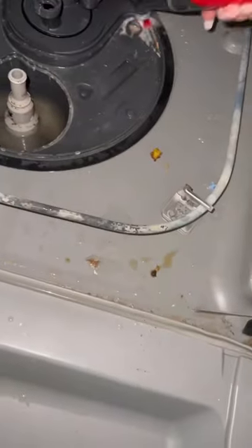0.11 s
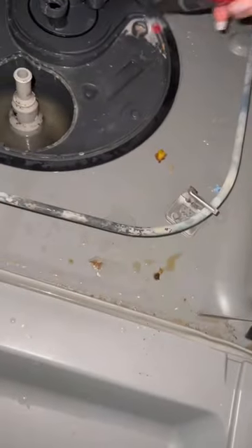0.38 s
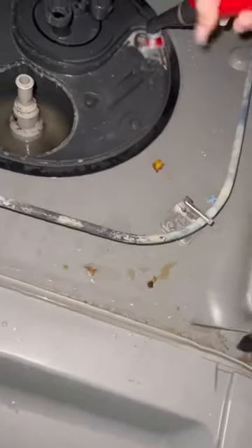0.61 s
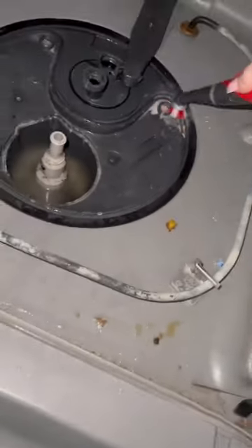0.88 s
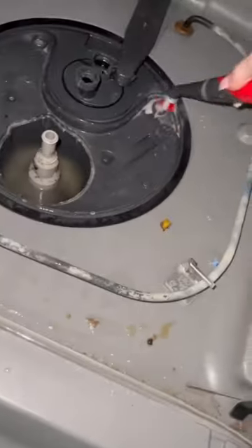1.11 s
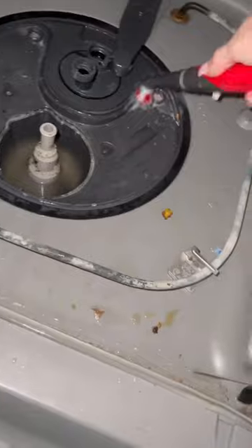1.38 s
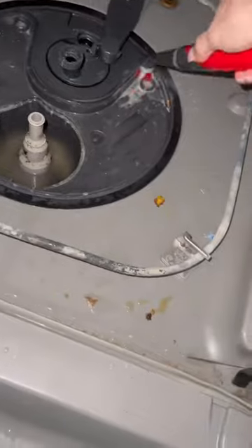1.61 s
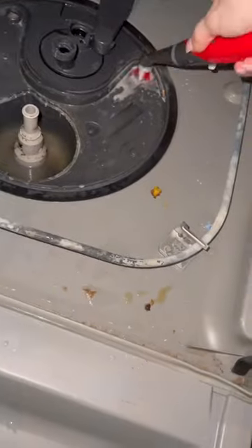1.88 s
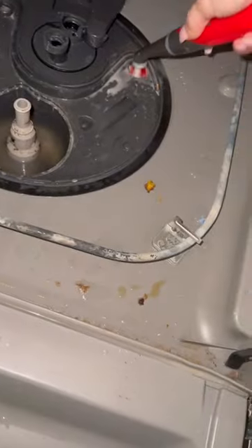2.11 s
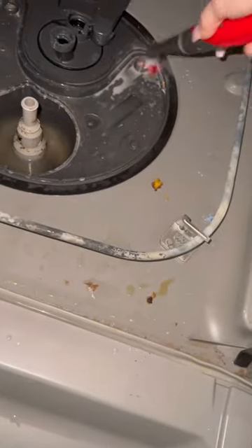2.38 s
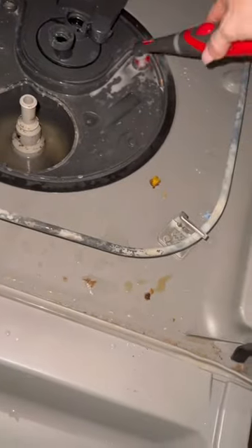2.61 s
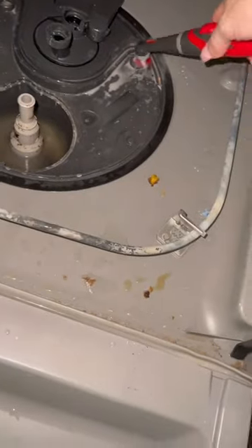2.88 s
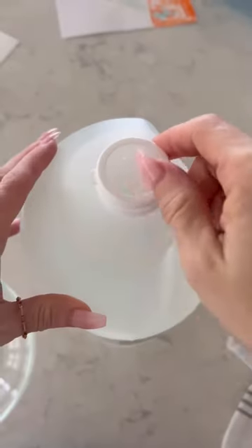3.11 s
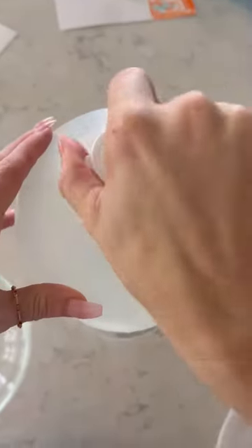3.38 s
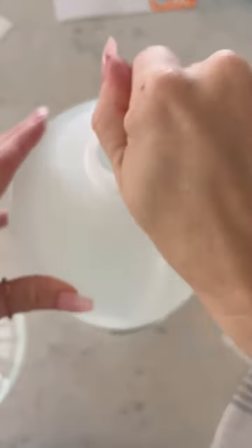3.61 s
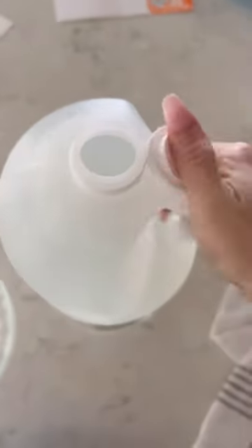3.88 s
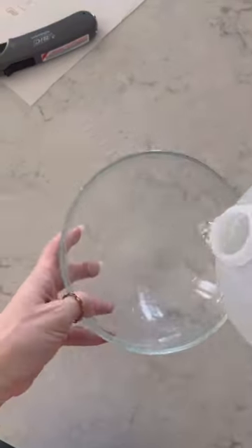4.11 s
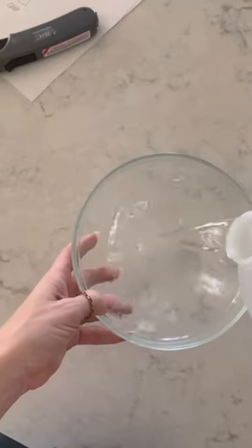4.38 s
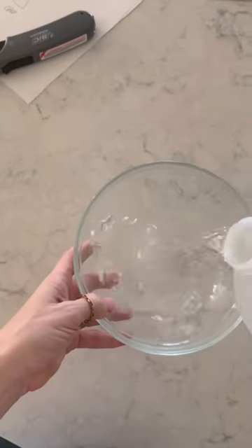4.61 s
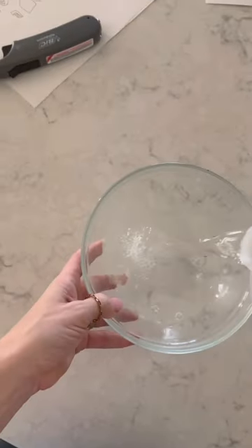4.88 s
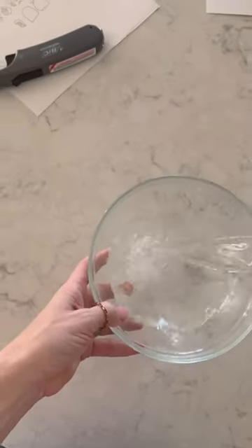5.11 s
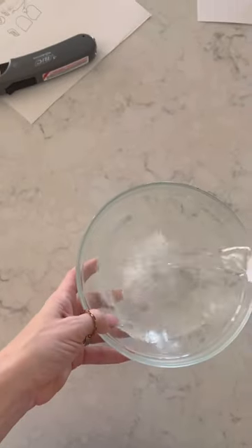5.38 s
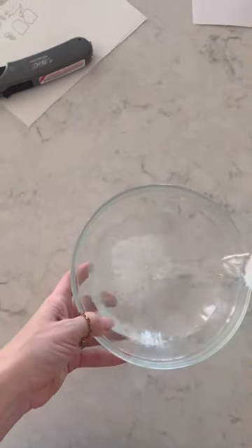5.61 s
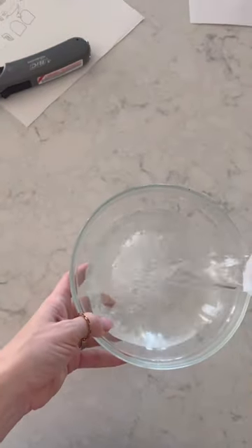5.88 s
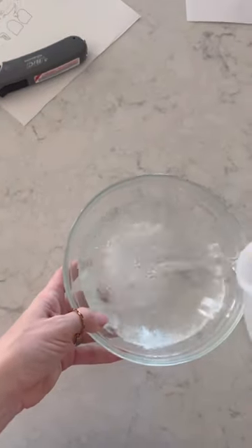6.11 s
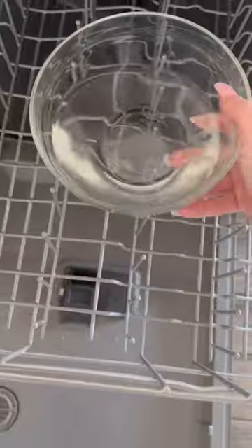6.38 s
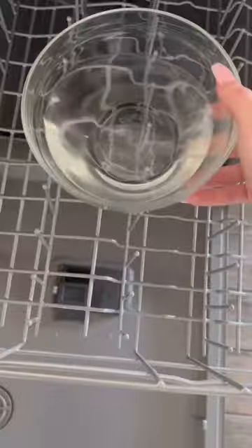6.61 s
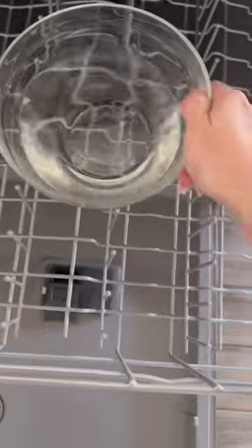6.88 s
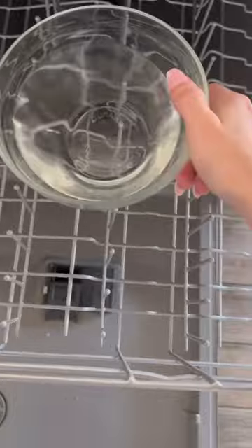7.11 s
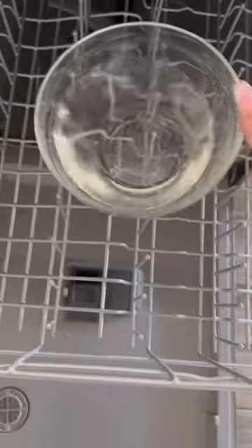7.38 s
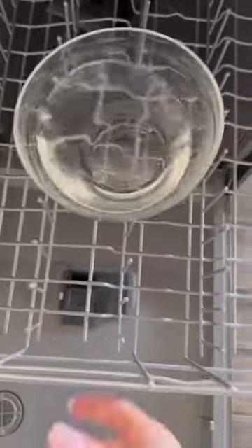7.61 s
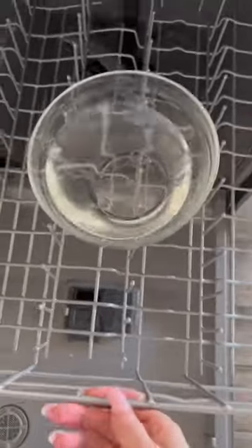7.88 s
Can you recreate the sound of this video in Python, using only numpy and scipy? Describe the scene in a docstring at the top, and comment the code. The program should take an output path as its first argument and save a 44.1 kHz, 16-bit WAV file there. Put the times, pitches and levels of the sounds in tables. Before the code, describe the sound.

From 0 to about 2.95 seconds a small motor brush scrubs a hollow plastic tub, very close and loud: rough buzzing pulses around 150 hertz, roughly eight a second at first, then less regular, sagging in pitch, with rib bumps, a strong press at 1.6 and a hard knock at 2.7. Jet hiss fills the gaps. An abrupt cut leaves a quiet kitchen hum. A tick at 3.04, then a sharp plastic crack with a hollow pop at 3.6, followed by small clicks and rasping until 3.95; faint air and rubbing near 4.1. From 4.35 to 6.25 a thin stream patters into a glass bowl, bright droplets, splashes and small bubbles slowly lowering in pitch. At 6.38 the bowl lands softly with a low ring, and at 6.75 to 7.25 drags and scrapes over wires with dull taps. Faint touches follow over room tone until 8.

```python
"""Four shots cut together, close to a phone. First a small motor brush scrubs a plastic tub (partials of the motor's
beats, coloured by the tub) while its jet hisses (noise). A jug's screw cap is turned and pops off (cracks, short
rings, rasping noise). Liquid is poured into a glass bowl (rising damped sines, splash noise). Last the bowl is set
and slid on a wire rack (resonant noise, ringing modes). A quiet kitchen hums behind (shaped noise, steady tones)."""
import sys
import numpy as np
from scipy import signal
from scipy.fft import rfft, irfft, next_fast_len
from scipy.io import wavfile
from scipy.ndimage import uniform_filter1d

SR = 44100
rng = np.random.default_rng(int(sys.argv[2]) if len(sys.argv) > 2 else 0)


def digitize_waveform(pressure):
    """Quantize a signal to 16-bit integers and store it at the path in sys.argv[1].

    Rows of a 2-D input are taken as channels; values are limited to [-1, 1].
    """
    field = np.atleast_2d(pressure).T
    bounded = np.clip(field, -1, 1)
    quanta = np.round(bounded * 32767).astype(np.int16)
    wavfile.write(sys.argv[1], SR, quanta)


def voltage_ratio(level):
    """Linear amplitude factor for a level in decibels (scalar or array-like)."""
    return 10 ** (np.asarray(level, float) / 20)


N = 352800

POUR_END_S = 6.3755  # cut from the pouring shot to the rack
# colour of the tub: (frequency [Hz], gain [dB])
TUB_COLOUR = [(55, -47.5), (90, -17.5), (150, -9), (300, 3), (390, -14), (450, -10.5), (580, -15),
              (650, -26), (755, -4), (830, -17.5), (910, -8.5), (1070, -14), (1250, -20), (1450, -23),
              (1750, -28.5), (2150, -22.5), (2600, -42.5)]
# colour of cracking and rasping plastic: (frequency [Hz], relative density [dB])
PLASTIC_COLOUR = [(650, -32), (1100, -14), (1590, -15.5), (2010, -3.5), (2700, -8.5), (4410, -7.5),
                  (5050, -8), (8260, -16), (9040, -12), (10000, -25), (11800, -17.5), (16000, -36)]
# stereo width of close sources: (frequency [Hz], side minus mid [dB])
CLOSE_WIDTH = [(60, -13), (150, -12), (380, -13), (950, 0.5), (2380, -10), (5980, -17.5), (15000, 0)]
# stereo width of the room and rack: (frequency [Hz], side minus mid [dB])
ROOM_WIDTH = [(60, -42), (150, -15.5), (380, -12), (950, -3.5), (2380, 5.5), (5980, 1), (15000, -7)]


def brush():
    """Presses couple the motor's beats into the tub; it also runs free; the jet is louder as the brush lifts."""
    # brush pressed on the tub: (peak time [s], level [dB], length [s], beats [Hz])
    strokes = [(0.043, -21, 0.052, 148), (0.16, -18.5, 0.04, 144), (0.276, -18, 0.045, 145.2),
               (0.391, -15.5, 0.027, 144), (0.513, -18.5, 0.046, 145), (0.761, -21.5, 0.026, 149.5),
               (0.874, -23, .047, 156.1), (1.002, -26, 0.059, 153.8), (1.096, -21.5, 0.028, 146.7),
               (1.135, -33, .07, 151.7), (1.232, -20.5, 0.049, 148.1), (1.336, -22.5, .047, 142.8),
               (1.486, -20, 0.061, 150.6), (1.626, -11.5, .028, 147.3), (1.799, -27.5, 0.045, 155.6),
               (1.908, -29, 0.039, 159), (1.997, -22, .075, 149.2), (2.391, -30.5, 0.05, 161.5),
               (2.553, -25, 0.055, 158.4), (2.84, -26, 0.16, 146.7)]
    # rougher presses of the brush, partials at halves of the ring: (peak time [s], level [dB], length [s], ring
    # [Hz])
    bumps = [(0.653, -29.5, 0.013, 350), (0.723, -26.5, 0.023, 327), (0.807, -31.5, 0.035, 313),
             (1.415, -15, 0.028, 235), (1.58, -18.5, 0.017, 293), (1.703, -41, 0.026, 294),
             (2.058, -22.5, 0.04, 251), (2.093, -17.5, 0.033, 255.4), (2.178, -17.5, 0.036, 253.7),
             (2.213, -19.5, 0.025, 226), (2.244, -23.5, 0.022, 272), (2.937, -16, 0.04, 222.4)]
    # how firmly the brush rests between presses: (time [s], motor drive into the tub [dB])
    firmness = [(0.0, -27.5), (0.53, -26.5), (0.66, -41), (0.74, -28), (0.94, -31.5), (1.18, -27.5),
                (1.45, -29), (1.6, -25.5), (1.83, -34), (2.1, -25.5), (2.33, -38), (2.39, -24.5),
                (2.46, -34.5), (2.61, -28), (2.71, -21), (2.81, -28), (2.93, -29.5), (2.96, -30.5)]
    # brush head knocking the tub: (frequency [Hz], level [dB], t60 [s])
    knock_modes = [(111, -14, 0.22), (207, -8, 0.14), (280, -13, 0.15), (552, -7.5, 0.06),
                   (674, -5, 0.0427), (1093, -11, 0.042), (3860, -14.5, 0.016)]
    # jet: (frequency [Hz], relative density [dB])
    jet_colour = [(650, -41.5), (1100, -6.5), (1330, -16.5), (1460, -11.5), (1820, -16), (2080, -5),
                  (3010, -4), (5580, -3), (6600, -1), (9240, -3), (10000, -4.5), (11800, -6), (15100, -9.5),
                  (16000, -21)]
    # stereo width of the scrubbing noise: (frequency [Hz], side minus mid [dB])
    scrub_width = [(60, -44), (92, -36), (140, -49.5), (210, -50), (330, -29.5), (500, -11.5), (770, -10),
                   (1170, -6.5), (1790, 8.5), (2740, -12.5), (4190, -8.5), (6410, -1.5), (9810, -2.5),
                   (15000, -57.5)]
    # stereo balance of the shot: (frequency [Hz], left minus right [dB])
    balance = [(200, 0), (380, .6), (900, -2), (2400, -1.5), (6000, 0)]
    shot_end_s, knock_s, body_lag_s = 2.9585, 2.6873, 0.002
    jet_db, usual_motor_db = -29.5, -27.5  # the jet's level at the usual contact
    muffle = 0.3  # dB of hiss lost per dB of firmer contact

    t = np.arange(N) / SR
    orders = np.arange(1, 17)[:, None]
    pressed = presses(strokes, orders, upper_db=-2.5, sag=0.06, rough=0.05, shape=1.5)
    pressed = pressed + presses(bumps, orders / 2, upper_db=-12, sag=0.028, rough=0.22, shape=2.4)

    motor_db, _ = curves(firmness)
    speed_hz = 156 + 5 * unit(uniform_filter1d(rng.standard_normal(N), size=3000))
    turn = 2 * np.pi * np.cumsum(speed_hz) / SR
    partials = voltage_ratio(along(TUB_COLOUR, orders * speed_hz)) * np.sin(orders * (turn + orders))
    free = unit(partials.sum(0))
    rumble = rush(TUB_COLOUR, scrub_width, patchy_db=4.5)
    motor = voltage_ratio(motor_db) * (voltage_ratio(-11.5) * free + voltage_ratio(-3) * rumble)
    jet_level = voltage_ratio(jet_db - muffle * (motor_db - usual_motor_db))
    jet = jet_level * rush(jet_colour, scrub_width, patchy_db=2.5, lag=0.22)

    # the crack comes first, the tub's body follows
    thump = bursts([knock_s + body_lag_s], [-17], [0.11]) * rush(TUB_COLOUR, scrub_width, patchy_db=0)
    crack = bursts([knock_s], [-17.5], [0.03]) * rush(PLASTIC_COLOUR, scrub_width, patchy_db=0)
    hz, db, t60 = np.transpose(knock_modes)
    knock = grains(knock_s + body_lag_s * (hz < 2000), db, hz, t60, soft=1.0)
    both = pressed + knock + thump + crack + motor + jet
    return filtered(both, lambda f: voltage_ratio(np.outer([0.5, -0.5], along(balance, f)))) * (t < shot_end_s)


def presses(rows, partials, upper_db, sag, rough, shape):
    """Partials through the tub; pitch falls steadily through each press; a power share `rough` is rattle."""
    rise_share = 0.46  # part of a press spent rising
    upper_fade_db = 7.5  # lost by partials above 660 Hz over a press's length
    t, out = np.arange(N) / SR, np.zeros(N)
    rattle = unit(filtered(rng.standard_normal(N), lambda hz: voltage_ratio(along(TUB_COLOUR, hz))))
    for s, db, length, hz in rows:
        rise, fall = rise_share * length, (1 - rise_share) * length
        span = slice(max(int((s - 4 * rise) * SR), 0), int((s + 4 * fall) * SR))
        d = t[span] - s
        press_db = -7 * np.abs(d / np.where(d < 0, rise, fall)) ** shape
        # pitch falls by the share `sag` per press length, passing hz at the peak
        phase = 2 * np.pi * hz * (d - 0.5 * sag * d * d / length)
        upper = partials * hz > 660
        gain_db = along(TUB_COLOUR, partials * hz) + 2.0 * rng.standard_normal(partials.shape)
        gain_db = gain_db + upper * (upper_db - upper_fade_db * d / length)
        start = rng.uniform(0, 2 * np.pi, partials.shape)
        tone = (voltage_ratio(gain_db) * np.sin(partials * phase + start)).sum(0)
        tone = tone / np.std(tone[np.abs(d) < 0.012])
        mixed = np.sqrt(1 - rough) * tone + np.sqrt(rough) * rattle[span]
        out[span] += voltage_ratio(db + press_db) * mixed
    return out


def cap():
    """Each contact is a broad crack plus a short ring; the thread rasps between them; air stirs in the neck."""
    # cap and jug contacts: (time [s], ring peak [dB], ring [Hz])
    contacts = [(3.042, -38, 2650), (3.0475, -42, 2470), (3.422, -54.5, 3370), (3.55, -57.5, 5000),
                (3.6043, -16, 4540), (3.6098, -28, 4020), (3.6263, -28.5, 1750), (3.7102, -42, 2360),
                (3.7703, -36.5, 9400), (3.7903, -29, 1990), (3.928, -33.5, 4440), (4.2062, -50, 2170),
                (4.2646, -52.5, 5600)]
    # hollow body ringing as the seal lets go: (time [s], level [dB], frequency [Hz], t60 [s])
    jug_rings = [(3.605, -9, 913, 0.009), (3.631, -20, 141.7, 0.06)]
    # fingers and thread rubbing: (start [s], length [s], level [dB])
    rubs = [(3.305, 0.046, -73), (3.61, 0.094, -69), (3.715, 0.122, -59.5), (3.857, 0.029, -39.5),
            (3.888, 0.0091, -43.5), (3.905, 0.083, -62), (4.12, 0.038, -76), (4.165, 0.177, -69)]
    # the cap's cup singing in the rubbing: (frequency [Hz], width [Hz], gain [dB])
    cup = [(2050, 250, -1), (4500, 500, -9), (9000, 500, -7)]
    # air moving as the jug tilts: (start [s], length [s], level [dB])
    tilts = [(4.0, 0.089, -54.5)]
    # air in the jug's neck: (frequency [Hz], width [Hz], gain [dB])
    neck = [(1050, 46, 4), (1240, 30, 9), (2390, 100, 2), (5040, 400, -13.5), (7700, 370, -11),
            (10940, 280, -15)]

    s, db, hz = np.transpose(contacts)
    crack = bursts(s, db - 8, 0.025 + 0 * s) * rush(PLASTIC_COLOUR, CLOSE_WIDTH, patchy_db=2)
    ring = grains(s, db, hz, 0.012 + 0 * s, pan_db=1.5)
    dry = crack + ring + grains(*np.transpose(jug_rings), soft=0.8)
    rasp = rush(PLASTIC_COLOUR, CLOSE_WIDTH, patchy_db=3.5)
    singing = voltage_ratio(-7.5) * resonant(rng.standard_normal(N), cup)
    rub = spells(rubs, attack=0.0062, release=0.041).sum(0) * (rasp + singing)
    air = spells(tilts, attack=0.034, release=0.14).sum(0) * resonant(rng.standard_normal(N), neck)
    leaning_left = voltage_ratio([[1.1], [-1.1]])
    return (dry + voltage_ratio(-10.5) * room(dry, 0.2) + rub + air) * leaning_left


def pour():
    """A thin stream patters on glass: spurts of splash, fine droplets, bubbles at the depth's pitch, drops."""
    # the stream: (time [s], flow [dB])
    flow = [(4.33, -69), (4.37, -55), (4.47, -54), (4.58, -45.5), (4.65, -44), (4.72, -46.5), (4.82, -46),
            (5.21, -48), (5.27, -39.5), (5.29, -51), (5.8, -52), (6.16, -50), (6.2, -47), (6.26, -58),
            (6.37, -62)]
    # single drops: (time [s], peak [dB], start pitch [Hz])
    drops = [(4.3607, -30, 8160), (4.372, -41, 4300), (4.4097, -22, 4840), (4.421, -33.5, 3040),
             (4.521, -28, 5030), (4.5394, -27.5, 3750), (4.5713, -27.5, 2500), (4.603, -25, 5200),
             (4.6357, -27, 5700), (4.7066, -24, 5600), (4.8144, -29.5, 4800), (4.8385, -27, 5300),
             (4.9475, -36.5, 2220), (4.986, -23, 7200), (5.0607, -34.5, 7300), (5.167, -34, 2470),
             (5.2592, -30.5, 5330), (5.359, -51, 1800), (5.4344, -38, 4200), (5.4865, -28.5, 1820),
             (5.5268, -33, 5600), (5.5955, -39, 1790), (5.7112, -41, 3870), (5.9316, -39, 11900),
             (5.952, -26, 14500), (6.0011, -33, 3760), (6.015, -33, 1580), (6.0528, -38, 11900),
             (6.067, -38.5, 1610), (6.0797, -32, 12200), (6.1077, -35, 13700), (6.189, -34, 3260),
             (6.192, -24.5, 11800), (6.207, -21.5, 11900), (6.2326, -32, 5800)]
    # spells of bubbles, deeper as the bowl fills: (start [s], length [s], level [dB], pitch [Hz])
    bubbles = [(4.406, 0.037, -59, 2900), (4.559, 0.097, -52, 2050), (4.9, .1, -55.5, 2280),
               (5.004, 0.28, -56.5, 2500), (5.255, 0.28, -53.5, 1920), (5.549, 0.083, -58, 1660),
               (5.637, 0.13, -60.5, 1976), (5.776, 0.14, -57, 1690), (5.941, 0.15, -52, 1664),
               (6.096, .11, -57, 1740)]
    # the last slug falls in: (time [s], peak [dB], start pitch [Hz], t60 [s])
    slug = [(6.19, -36, 510, 0.072)]
    # splash: (frequency [Hz], relative density [dB])
    splash_colour = [(1530, -77), (2600, -7), (3140, -10.5), (3590, 5), (4370, -7), (5430, 7.5), (6280, 1),
                     (7550, 5.5), (10300, -3), (13400, -47), (22000, -120)]

    t = np.arange(N) / SR
    db, gate = curves(flow)
    falling = gate & (t < 6.245)
    air_db = -62.5 + 0.23 * (db + 50)  # spray above 10 kHz gains 0.23 dB per dB of flow
    gurgles = spells(bubbles, attack=0.027, release=0.086)
    bubble_hz = np.transpose(bubbles)[3][gurgles.argmax(0)]
    droplet_hz = 5600 - 640 * (t - flow[0][0])  # droplets sound lower as the bowl fills
    # the stream breaks up into spurts, bubbles come in clumps
    spurts = voltage_ratio(3.5 * unit(uniform_filter1d(rng.standard_normal(N), size=260)))
    clumps = voltage_ratio(3.0 * unit(uniform_filter1d(rng.standard_normal(N), size=1200)))

    wet = shower(voltage_ratio(db - 3.5), falling, count=3200, hz=droplet_hz, spread=0.3, cycles=33, size_db=5.0)
    spray_hz = 12494 + 0 * db
    wet = wet + shower(voltage_ratio(air_db - 5.5), falling, count=1000, hz=spray_hz, spread=0.1, cycles=34, size_db=5)
    bubbling = clumps * gurgles.sum(0)
    wet = wet + shower(bubbling, falling, count=560, hz=bubble_hz, spread=0.077, cycles=37, size_db=4.0)
    s, drop_db, hz = np.transpose(drops)
    wet = wet + grains(s, drop_db, hz, 44 / hz, rise=0.1, pan_db=1.5, soft=1.4)
    wet = wet + grains(*np.transpose(slug), rise=0.21)

    # each drop throws its own splash
    level = gate * spurts * voltage_ratio(db - 11.0) + bursts(s, drop_db - 20.5, 0.028 + 0 * s)
    air = rush([(9800, -60), (10800, 0), (15500, -3), (16200, -60)], [(1000, -14)], patchy_db=2)
    splash = level * rush(splash_colour, CLOSE_WIDTH, patchy_db=3) + level * voltage_ratio(air_db - db) * air
    return (wet + voltage_ratio(-10.5) * room(wet, 0.089) + splash) * (t < POUR_END_S)


def shower(level, gate, count, hz, spread, cycles, size_db):
    """Random droplets: log-normal pitch about hz, exponential sizes in dB, following a level curve."""
    live = np.flatnonzero(gate)
    at = live[(rng.random(count) * live.size).astype(int)]
    size = np.minimum(rng.exponential(size=count), 3.5)
    pitch = np.clip(hz[at] * np.exp(spread * rng.standard_normal(count)), 1500, 15500)
    x = grains(at / SR, size_db * size, pitch, cycles / pitch, rise=0.13, pan_db=2.5, soft=1.33)
    return level * gate * x / np.std(x[:, live])


def rack():
    """The bowl's weight drags over coated wires and taps them; both ring the rack's modes."""
    # the rack's modes: (frequency [Hz], width [Hz], gain [dB])
    wires = [(337.6, 30, 9.5), (584, 56, 7.5), (1087, 35, -7.5), (1628, 100, -15.5), (1860, 42, -20),
             (2030, 38, -20), (2490, 40, -23.5), (3165, 130, -26.5)]
    # the bowl's weight dragging on the wires: (time [s], load [dB])
    drag = [(6.746, -58), (6.76, -50), (6.89, -39.5), (7.094, -45), (7.258, -58), (7.53, -59.5),
            (7.88, -76), (7.98, -54), (8.0, -68)]
    # bowl touching wires: (time [s], strength [dB])
    touches = [(6.754, -40), (6.83, -45), (6.844, -38), (6.873, -36), (6.976, -34), (6.997, -51),
               (7.347, -54), (7.38, -55), (7.665, -54)]
    # the bowl lands: (time [s], peak [dB], start pitch [Hz], t60 [s])
    landing = [(6.377, -41, 372, .5), (6.377, -42, 560, .22), (6.377, -48, 170, .1)]
    # glass scraping while it slides: (start [s], length [s], level [dB])
    slides = [(6.376, 0.044, -64.5), (6.75, 0.35, -63)]
    # scrape: (frequency [Hz], relative density [dB])
    scrape_colour = [(760, -31), (1300, 5), (1430, 1), (2070, 3.5), (4070, -14), (9040, -8), (13800, -41),
                     (15500, -45)]
    # low body of the drag: (frequency [Hz], relative density [dB])
    body_colour = [(90, -22), (180, -3.0), (350, -13), (700, -5.5), (1300, -18.5), (2000, -61)]

    db, gate = curves(drag)
    # the rack shudders under the bowl and calms down
    load = gate * voltage_ratio(db) + bursts([6.378], [-41], [0.81])
    lumps = voltage_ratio(2.7 * unit(uniform_filter1d(rng.standard_normal(N), size=300)))
    ring = resonant(lumps * rng.standard_normal(N), wires)
    body = rush(body_colour, ROOM_WIDTH, patchy_db=3.5)

    s, tap_db = np.transpose(touches)
    hz, width, mode_db = np.transpose(wires)
    levels = tap_db[:, None] + 0.6 * mode_db - 11 + 3 * rng.standard_normal((len(s), len(hz)))
    taps = grains(np.repeat(s, len(hz)), levels.ravel(), np.tile(hz, len(s)), np.tile(7 / width, len(s)))
    taps = taps + grains(*np.transpose(landing), rise=-0.06)
    scrape = spells(slides, attack=0.013, release=0.27).sum(0)
    scrape = scrape * rush(scrape_colour, ROOM_WIDTH, patchy_db=3.5)
    return taps + load * (voltage_ratio(-2.5) * ring + voltage_ratio(-7.0) * body) + scrape


def kitchen():
    """Room tone as shaped noise and a wavering hum; the rack's shot has its own tone and thin whines."""
    # the room from the counter: (frequency [Hz], relative density [dB])
    counter_colour = [(18, -75), (30, -50), (88, -7.5), (221, -5), (328, -9), (649, -7), (889, -13.5),
                      (962, -12.5), (1390, -25.5), (1500, -23), (1860, -36), (2010, -31), (4300, -46.5),
                      (9220, -57.5), (16000, -62.5)]
    # the room from inside the machine: (frequency [Hz], relative density [dB])
    inside_colour = [(18, -88), (30, -70), (81, -6), (153, -10), (210, -12.5), (374, -4), (437, -9.5),
                     (512, -9), (844, -13.5), (1070, -25), (1350, -23.5), (1500, -38), (2410, -33),
                     (2610, -39.5), (16000, -66)]
    # appliance hum: (frequency [Hz], rms level [dB])
    hum = [(118, -65), (242, -66.5), (468, -63.5)]
    # thin tones inside the machine: (frequency [Hz], rms level [dB])
    whine = [(2370, -83), (2480, -90), (4400, -96), (7100, -96.5)]

    t = np.arange(N) / SR

    def tones(rows):
        """Sines whose phase wanders at random."""
        drift = np.cumsum(rng.standard_normal((len(rows), N)), axis=1) * 0.015
        return sum(np.sqrt(2) * voltage_ratio(db) * np.sin(2 * np.pi * hz * t + d) for (hz, db), d in zip(rows, drift))

    counter = voltage_ratio(-56) * rush(counter_colour, ROOM_WIDTH, patchy_db=1.5)
    inside = voltage_ratio(-56) * rush(inside_colour, ROOM_WIDTH, patchy_db=2.0) + tones(whine)
    return np.where(t < POUR_END_S, counter, inside) + tones(hum)


def unit(x):
    """Scaled to rms 1."""
    return x / np.sqrt(np.mean(x ** 2) + 1e-20)


def along(points, hz):
    """Values between (frequency [Hz], value) points on a log axis."""
    f, v = np.transpose(points)
    return np.interp(np.log(hz + 1), np.log(f + 1), v)


def curves(rows):
    """One value per sample for each column after the time, and a gate open over the table's span."""
    s, *cols = np.transpose(rows)
    t = np.arange(N) / SR
    return [np.interp(t, s, c) for c in cols] + [(t >= s[0]) & (t <= s[-1] + 0.01)]


def filtered(x, response):
    """x times a response of frequency."""
    m = next_fast_len(N + 8192)
    return irfft(rfft(x, m) * response(np.fft.rfftfreq(m, 1 / SR)), m)[..., :N]


def resonant(x, peaks):
    """x through resonances (frequency [Hz], width [Hz], gain [dB]) of alternating sign, rms 1."""
    def response(f):
        return sum((-1) ** k * voltage_ratio(db) * 1j * f * w / (c * c - f * f + 1j * f * w)
                   for k, (c, w, db) in enumerate(peaks))
    return unit(filtered(x, response))


def rush(spectrum, side, patchy_db, lag=0.0):
    """Stereo noise, mid rms 1, in patches of random gain; a power share `lag` of the side delays the left."""
    z = signal.stft(rng.standard_normal((2, N)), nperseg=256)[2]
    field = uniform_filter1d(rng.standard_normal(z.shape[1:]), size=5, axis=0)
    field = uniform_filter1d(field, size=8, axis=1)
    pair = signal.istft(z * voltage_ratio(patchy_db * unit(field)), nperseg=256)[1][:, :N]
    if lag:
        quarter_cycle_late = filtered(pair[0], lambda hz: -1j)
        pair[1] = np.sqrt(1 - lag) * pair[1] + np.sqrt(lag) * quarter_cycle_late
    m, s = filtered(pair, lambda hz: voltage_ratio(along(spectrum, hz) + [0 * hz, along(side, hz)]))
    return np.array([m + s, m - s]) / np.std(m)


def grains(s, db, hz, t60, rise=0.0, pan_db=0.0, soft=0.35):
    """Damped sines starting over `soft` cycles, pitch gliding by 2 * rise over t60, each panned by chance."""
    t = np.arange(int(min(np.max(t60), 0.4) * SR))[None] / SR
    u = t / t60[:, None]
    wave = np.sin(2 * np.pi * hz[:, None] * t * (1 + rise * u)) * voltage_ratio(db[:, None] - 60 * u)
    wave = wave * (1 - np.exp(-(t * hz[:, None] / soft) ** 2))
    at = (np.round(s * SR).astype(int)[:, None] + np.arange(t.size)).ravel()
    pan = pan_db * rng.standard_normal((len(s), 1))
    return np.array([np.bincount(at, (wave * voltage_ratio(side * pan)).ravel(), N + SR)[:N] for side in (1, -1)])


def bursts(s, db, t60):
    """Envelope of sudden starts that die away."""
    t = np.arange(N) / SR
    return sum((t >= at) * voltage_ratio(level_db - 60 * np.abs(t - at) / life) for at, level_db, life in zip(s, db, t60))


def spells(rows, attack, release):
    """One envelope per (start, length, level) row: a ramp, a hold, then 60 dB lost over the release."""
    s, length, db = np.transpose(rows)[:3, :, None]
    d = np.arange(N) / SR - s
    return np.clip(d / attack, 0, 1) * voltage_ratio(db - 60 * np.clip(d - length, 0, 9) / release)


def room(x, t60):
    """A short diffuse tail of decaying noise, different in each ear."""
    t = np.arange(SR // 3) / SR
    tail = rng.standard_normal((2, t.size)) * voltage_ratio(-60 * t / t60) * (t > 0.003)
    return signal.fftconvolve(x, tail / np.linalg.norm(tail[0]), axes=1)[:, :N]


def scene():
    """All shots in a row, over the kitchen."""
    return brush() + cap() + pour() + rack() + kitchen()


def roll_off(x):
    """The treble ends steeply here."""
    return signal.sosfilt(signal.butter(12, 17060, fs=SR, output="sos"), x)


def record(dry):
    """The overall colour: a dip near 10 kHz, brighter treble above, an end near 16 kHz."""
    # overall colour of the sound: (frequency [Hz], gain [dB])
    overall_colour = [(8500, 0), (9700, 0), (10200, -6), (10700, 2), (15700, 7.5), (15900, -77)]
    coloured = filtered(dry, lambda hz: voltage_ratio(along(overall_colour, hz)))
    return roll_off(coloured)


dry = scene()
out = record(dry)
digitize_waveform(out)
```